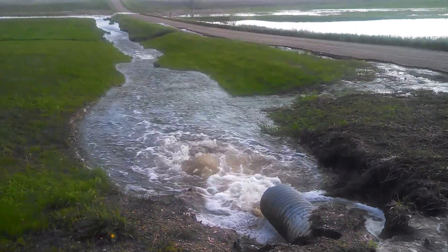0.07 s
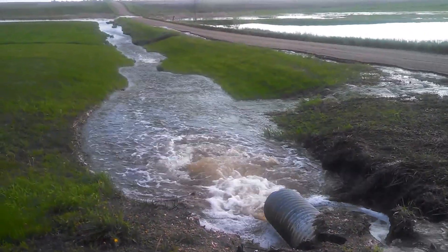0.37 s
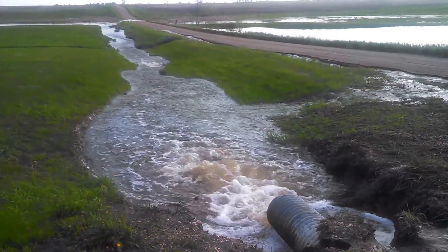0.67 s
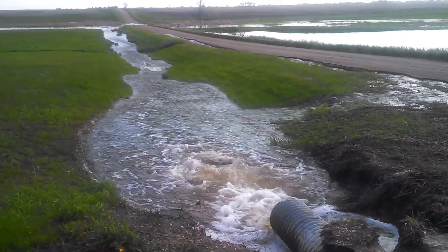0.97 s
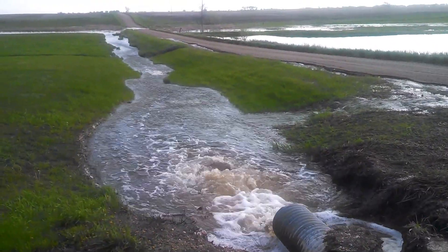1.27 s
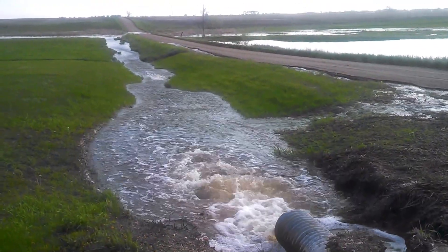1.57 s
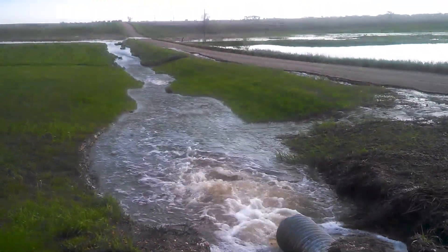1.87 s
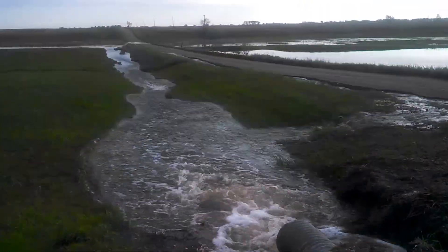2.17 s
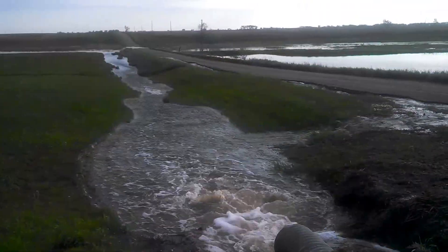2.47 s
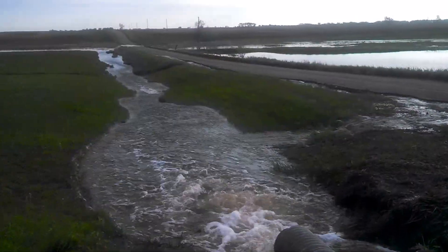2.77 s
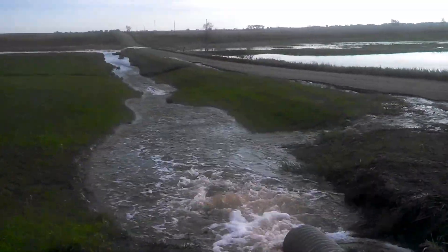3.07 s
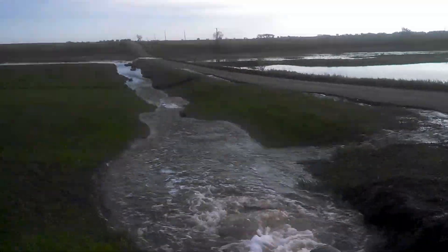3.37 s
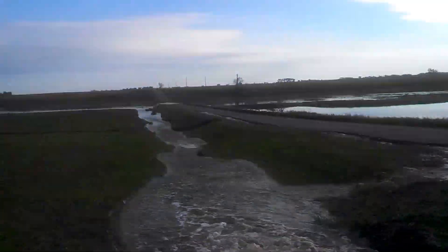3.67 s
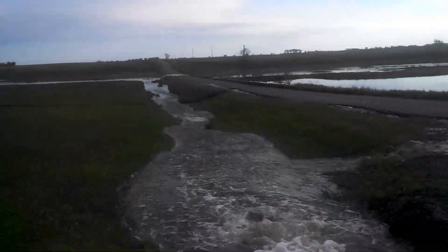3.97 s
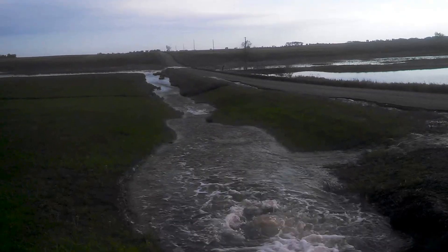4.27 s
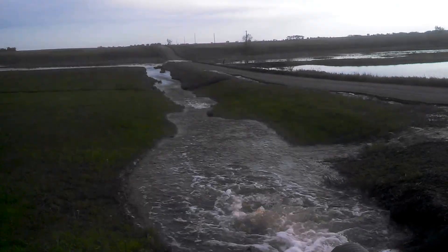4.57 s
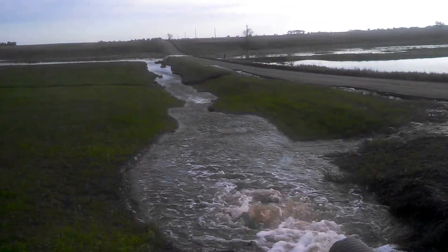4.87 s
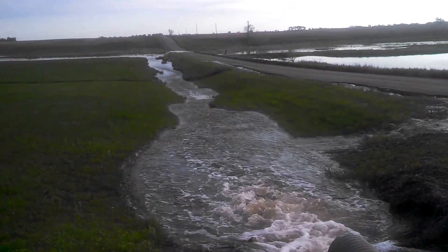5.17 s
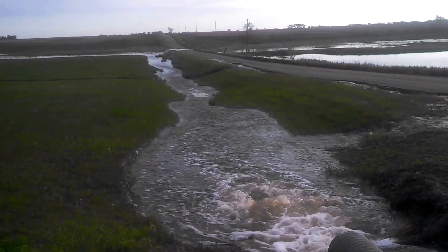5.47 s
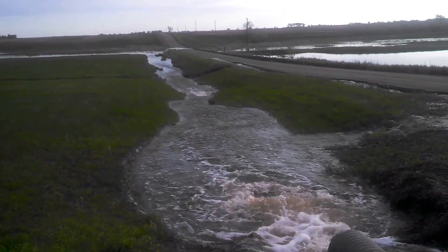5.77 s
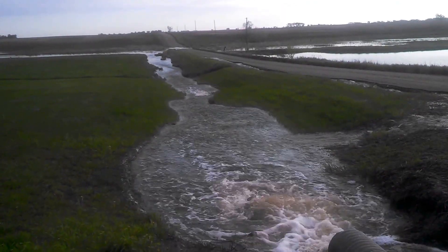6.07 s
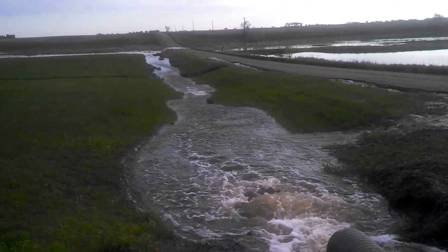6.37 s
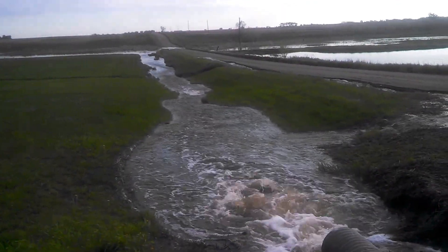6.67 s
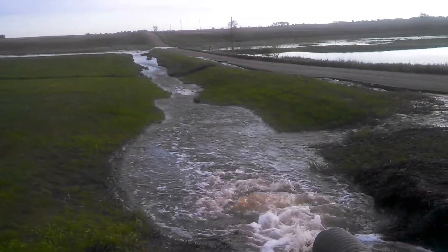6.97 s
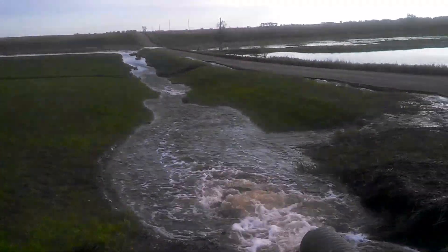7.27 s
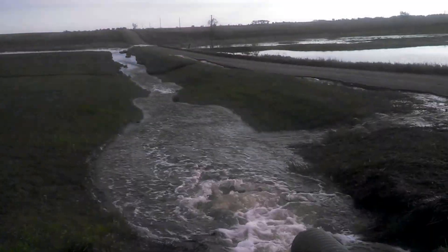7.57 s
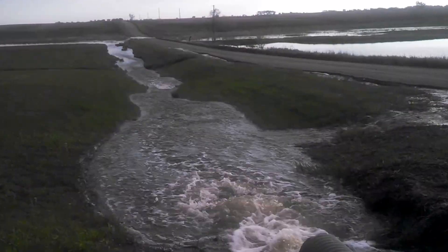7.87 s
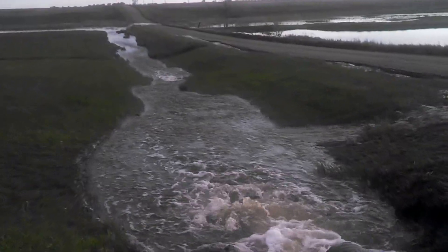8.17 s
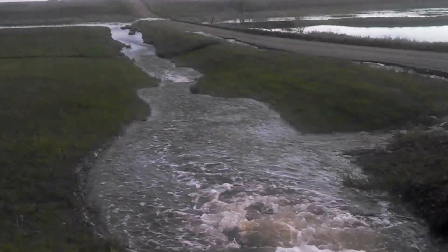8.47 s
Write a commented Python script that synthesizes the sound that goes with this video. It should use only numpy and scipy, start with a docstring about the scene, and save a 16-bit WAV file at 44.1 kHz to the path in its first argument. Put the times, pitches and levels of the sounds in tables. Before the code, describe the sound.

A steady roar of bubbling, splashing water runs throughout as a pipe empties into an outdoor pool. Uneven gusts thump and rumble against the microphone, and short whistles from a far bird are nearly buried in the rush. In the second half, fingers make three sharp clicks on the handheld camera. The strongest gusts and clicks briefly duck the sound, and a very faint high whine lies underneath.

```python
"""In open country, floodwater pours from a culvert pipe and churns a wide pool into bubbles and spray.
A songbird whistles far off. Wind buffets the two microphone ports (openings) of a hand-held camera,
whose case clicks three times under the fingers and whose electronics whine faintly.
The hardest buffets and clicks make the gain control duck, and the water swells back each time."""
import sys
import numpy as np
from scipy import signal
from scipy.fft import rfft, irfft
from scipy.io import wavfile
from scipy.ndimage import uniform_filter1d, minimum_filter1d

SR = 44100
rng = np.random.default_rng(int(sys.argv[2]) if len(sys.argv) > 2 else 0)


def generate_wav(sig):
    """Save sig (samples, or channels by samples) to the path in sys.argv[1] as 16-bit PCM at SR."""
    pcm = np.round(np.clip(np.atleast_2d(sig).T, -1, 1) * 32767).astype(np.int16)
    wavfile.write(sys.argv[1], SR, pcm)


N = 379701
TIME = np.arange(N) / SR
FRAME_S = np.arange(N // 256 + 5) * 256 / SR  # slow changes move in frames, 256 samples apart
BIN_HZ = np.fft.rfftfreq(1024, 1 / SR)  # the frequencies in each frame


# How hard the pipe pours. Each row: time in seconds, level in dB.
OUTFLOW_LEVELS = [(0.0, -5), (0.35, -1.2), (0.9, -2), (1.06, -2.5), (1.3, -4.5), (1.7, -3), (2.04, -0.7),
                  (2.25, -2), (2.44, -3), (2.66, -1.4), (2.92, -3.5), (3.2, -1.5), (3.9, -4), (4.1, -4),
                  (4.33, -6), (4.6, -3), (4.8, -4), (5.4, -3.5), (6.1, -2), (7.3, -1.5), (8.6, 0)]

def outflow(surge_db=0.41):
    """The flow swells and slackens, with small chance surges. Gives dB for each frame."""
    swell_db, = follow(OUTFLOW_LEVELS, FRAME_S)
    return swell_db + surge_db * wander(slow_hz=2.2, fast_hz=9)


# Heaves of the water. Each row: time of the crest in seconds, boost in dB, length in seconds.
WATER_HEAVES = [(0.222, 4.5, 0.079), (0.473, 3.5, 0.083), (1.15, 5.5, 0.071), (1.823, 2.5, 0.13),
                (2.66, -1.5, .08), (3.282, 3.5, 0.1), (3.43, 3.5, 0.16), (3.732, 7, 0.18),
                (4.052, 3.5, 0.18), (4.16, 1, 0.074), (4.583, -0.5, 0.09), (5.6, -1.5, 0.13),
                (7.29, 1.5, 0.095)]

def heaving(centre_hz=960, reach_octaves=1.44):
    """The water heaves and collapses, changing the middle of the rush. Gives dB by frame and frequency."""
    lift_db = sum(db * swell(s, length) for s, db, length in WATER_HEAVES)
    return lift_db[:, None] * np.exp(-(np.log2((BIN_HZ + 1) / centre_hz) / reach_octaves) ** 2)


# The tone of the rushing water. Each row: frequency in Hz, relative level in dB.
RUSH_TONE = [(200, -0.76), (330, 2), (420, -2.5), (520, -12), (680, -5.5), (900, -9), (1300, -12.5),
             (1750, -12.5), (2150, -6.5), (2550, -11), (2950, -15), (3300, -15.5), (4100, -15.5),
             (5000, -17), (5800, -19), (6500, -21), (10000, -23), (12500, -26), (14000, -26.5),
             (15000, -31.5)]
# The ground echo colours the rush as the camera moves. Each row: time in seconds,
# factor on the lower frequencies, boost near 2100 Hz in dB, boost of the top treble in dB.
GROUND_ECHO = [(0, 0.99, -4.5, -1), (2.0, 1.014, -3.5, -1.7), (2.8, 1.02, -3, -1), (3.25, 1.02, -2, 1),
               (3.6, 0.93, -0.5, 2.5), (4.8, 0.99, 1.5, -1), (5.5, 0.93, -1, -0.5), (7.0, 0.96, 1, -1),
               (8.4, 1, 0.5, -3)]
# How alike the rush is at the two ports. Each row: frequency in Hz, likeness (1 same, -1 opposite).
PORT_LIKENESS = [(300, 0.97), (520, 0.84), (950, 0.86), (1700, 0.12), (2200, 0.4), (3000, 0.16),
                 (4100, -0.2), (5500, 0.018), (6800, -0.19), (12000, 0.081), (15000, -0.077)]

def rush(flow_db, level_db=-17.5, gulp_db=1.5, slosh_db=0.84, lag_s=0.000018):
    """Countless bubbles merge into a roar; clouds of them come and go in patches."""
    shift, lift_db, top_db = follow(GROUND_ECHO, FRAME_S[:, None])
    spray_share = 1 / (1 + (1900 / (BIN_HZ + 1)) ** 4)  # 0 in the bass, 1 in the treble
    tone_db = read(RUSH_TONE, BIN_HZ / shift ** (1 - spray_share))
    tone_db += lift_db * np.exp(-((BIN_HZ - 2100) / 400) ** 2)
    tone_db += top_db / (1 + (7500 / (BIN_HZ + 1)) ** 6)  # up here the aim of the ports matters
    tone_db += flow_db[:, None] + heaving()
    tone_db += gulp_db * (1 - 0.04 * spray_share) * patches(span_s=0.04, span_hz=350)
    tone_db += slosh_db * patches(span_s=0.04, span_hz=6600)
    left, unrelated = random_spectra()
    likeness = read(PORT_LIKENESS, BIN_HZ)
    right = likeness * left + np.sqrt(1 - likeness ** 2) * unrelated
    right *= np.exp(-2j * np.pi * BIN_HZ * lag_s)  # a tiny delay: the water lies a little to one side
    return gain_of(level_db) * to_sound(np.array([left, right]) * gain_of(tone_db))


def bubbles(low_hz, high_hz, per_s, cycles, rise, spread_db, lag_s, sizes=30):
    """Bubbles of many sizes ring at random moments, each size from its own direction."""
    out = np.zeros((2, N))
    for hz in np.geomspace(low_hz, high_hz, sizes):
        born = rng.random(N) < per_s / sizes / SR
        strength = gain_of(spread_db * np.minimum(rng.exponential(1, N), 4))
        sound = signal.oaconvolve(born * strength, ring(hz, cycles / hz, rise))[:N]
        delay = round(rng.uniform(-1, 1) * lag_s * SR)
        out += [sound, np.roll(sound, delay)]
    return evened(out)


# Single splashes and plops. Each row: start in seconds, level in dB, pitch in Hz, ring time in seconds.
POOL_SPLASHES = [(0.204, -12, 1120, 0.018), (0.8395, -8.5, 4160, 0.0055), (0.982, -10, 724, 0.022),
                 (1.3, -5, 3950, 0.0052), (1.538, -21.5, 3900, 0.0072), (2.204, -19, 4040, 0.0055),
                 (2.596, -16, 3340, 0.006), (2.655, -13, 880, 0.043), (3.3889, 4, 1090, 0.0026),
                 (3.389, -5, 3800, 0.0022), (3.406, -13, 950, .025), (4.002, -14, 800, .03),
                 (4.051, -16, 1084, .025), (4.599, -19, 3920, 0.0055), (4.692, -16, 800, 0.022),
                 (5.519, -2, 2770, 0.0082), (5.569, -4, 2900, 0.0034), (6.067, -6.5, 770, 0.034),
                 (6.267, -16, 4130, 0.013), (6.4195, -12, 8900, 0.004), (6.763, -9, 3260, 0.0073),
                 (7.088, -6, 705, 0.021), (7.653, -8, 7300, 0.004), (7.764, -11, 4880, 0.0056)]

def pool(flow_db, gurgle_db=-28, patter_db=-32):
    """Near bubbles gurgle, flung droplets patter back on the pool, and single splashes stand out."""
    gurgle = bubbles(698, 2394, per_s=260, cycles=36, rise=0.038, spread_db=0.5, lag_s=0.00008)
    patter = bubbles(2575, 10670, per_s=1100, cycles=20, rise=0.055, spread_db=5, lag_s=0.0003)
    flow = gain_of(np.interp(TIME, FRAME_S, flow_db))
    splashes = rings(POOL_SPLASHES) * [[1], [0.6]]  # left and right strength
    return flow * (gain_of(gurgle_db) * gurgle + gain_of(patter_db) * patter) + splashes


# The breeze. Each row: time in seconds, relative level in dB, speed (a factor on the rumble's pitch).
BREEZE_CURVE = [(0, -19, 0.82), (0.95, -17, 0.82), (1.3, -11.5, 0.88), (1.7, -18, 0.69), (2.2, -17.5, 0.92),
                (2.48, -15.5, 1.57), (3.0, -21, 0.95), (3.2, -21, 0.61), (3.65, -28, 0.78),
                (4.3, -17.5, 1.45), (4.58, -24.5, 1), (4.9, -13, 1.2), (5.3, -28, 0.83),
                (6.55, -23.5, 0.98), (7.0, -25, 0.49), (7.95, -24, 0.94), (8.2, -14, 0.94),
                (8.6, -16.5, 1.45)]
# Gusts. Each row: time of the crest in seconds, relative level in dB, length in seconds, speed as above.
WIND_GUSTS = [(0.09, -10, 0.041, 0.5), (0.38, -10, 0.06, 0.71), (0.98, -10.5, 0.023, 1.7),
              (1.218, -9, 0.068, 0.5), (1.805, -12.5, 0.087, 0.78), (2.297, -6, 0.039, 1.45),
              (2.336, -10, 0.037, 1.6), (2.483, -10.5, 0.095, 1.55), (2.555, -9, 0.037, 1.2),
              (2.69, -9, 0.024, 1.55), (2.785, -15, .06, 1.25), (2.85, -6.5, 0.042, 1.1),
              (2.964, -5.5, 0.043, 1.6), (2.99, -1.5, .025, 1.05), (3.062, -6.5, 0.024, 1.47),
              (3.391, -12.5, 0.02, 2), (3.735, -9, 0.06, 1.1), (3.812, -8.5, 0.12, 0.98),
              (3.887, -12.5, 0.051, 1), (4.18, -9, 0.03, 1.15), (4.45, -14.5, 0.086, 0.67),
              (4.628, -12, 0.032, 1.1), (4.699, -12.5, 0.022, 1.4), (4.773, -2, 0.065, 1.42),
              (4.856, -7, 0.045, 1), (4.896, -8, 0.033, 2), (4.994, -10.5, 0.068, 1.24),
              (5.196, -15, 0.048, 1.5), (5.398, -8, 0.024, 1.2), (5.479, -10, 0.059, 0.91),
              (5.608, -11.5, 0.025, 1.04), (5.647, -15, 0.019, 1.06), (5.81, -17, 0.04, 0.86),
              (5.899, -8.5, 0.054, 1), (6.004, -11, 0.019, 1.4), (6.142, -15.5, 0.06, .9),
              (6.38, -19, 0.04, 1.5), (6.59, -20.5, 0.11, 1.3), (6.68, -13, 0.1, 0.71),
              (7.166, -10.5, .06, 0.49), (7.461, -12.5, 0.044, 0.92), (8.12, -8, 0.092, 1.4),
              (8.488, -10, 0.063, 0.86)]

def airflow(flutter_db=2):
    """Strength and speed of the fluttering breeze plus its gusts; the strongest sways the speed most."""
    breeze_db, breeze_speed = follow(BREEZE_CURVE, FRAME_S)
    breeze_db += flutter_db * wander(slow_hz=4, fast_hz=11)
    currents = [(gain_of(breeze_db), breeze_speed)]
    currents += [(gain_of(db) * swell(s, length), speed) for s, db, length, speed in WIND_GUSTS]
    power = sum(strength ** 2 for strength, _ in currents)
    mean_speed = sum(strength ** 2 * speed for strength, speed in currents) / power
    return np.sqrt(power), mean_speed


# The rumble of swirling air. Each row: frequency in Hz, relative level in dB.
RUMBLE_TONE = [(20, -7.5), (45, 4), (70, 5), (130, -1.5), (200, -5.5), (300, -17), (450, -29), (800, -46),
               (2000, -34.5), (6000, -83)]
# Slams of air. Each row: time in seconds, relative level in dB, half length in seconds, pitch in Hz.
AIR_SLAMS = [(2.268, 6, 0.003, 128), (2.492, -2, 0.0028, 192), (2.966, 7.5, 0.0026, 229),
             (4.718, 9.5, 0.003, 129)]

def wind(level_db=5):
    """Swirls of air rumble on each port separately; now and then one slams into the left port."""
    strength, speed = airflow()
    tone_db = read(RUMBLE_TONE, BIN_HZ / speed[:, None])  # faster air: smaller swirls, higher rumble
    swirls = to_sound(random_spectra() * gain_of(tone_db))
    # Even out the swirls, so the air's strength sets the pressure difference between the ports.
    difference_power = (swirls[0] - swirls[1]) ** 2 / 2
    swirls /= np.sqrt(0.15 + signal.oaconvolve(difference_power, np.hanning(2001) / 1000, "same"))
    slams = np.zeros(N)
    for s, db, half_s, hz in AIR_SLAMS:
        pulse = np.exp(-((TIME - s) / half_s) ** 2)
        slams += 2 * gain_of(db) * pulse * np.cos(2 * np.pi * hz * (TIME - s))
    return gain_of(level_db) * np.interp(TIME, FRAME_S, strength) * swirls + slams * [[1], [0]]


# The tones the case rings with. Each row: pitch in Hz, relative level in dB.
CASE_TONES = [(1300, -17), (2300, -20), (3900, 0.5), (6300, 2.5), (7600, 4), (8700, 4), (10300, 4),
              (11700, 2), (13100, -3), (14900, -10.5)]
# Sharp clicks. Each row: start in seconds, relative level on the left and on the right in dB,
# ring time in seconds, brightness in dB per octave.
CASE_CLICKS = [(5.6862, -12, 10.5, 0.005, 3), (7.3704, 9.5, 3.5, 0.0037, -2), (7.4778, 20, -4, 0.004, 7)]
# Dull finger knocks. Each row: start in seconds, level in dB, pitch in Hz, ring time in seconds.
FINGER_KNOCKS = [(5.687, -1, 2100, 0.0034), (7.3705, -4.5, 2100, 0.0054), (7.4700, -6, 1280, 0.014),
                 (7.4775, -2, 900, 0.0052)]

def camera_case():
    """The plastic case knocks dully under the fingers and snaps, beside one port or between the two."""
    clicks = np.zeros((2, N))
    for s, left_db, right_db, ring_s, tilt_db in CASE_CLICKS:
        snap = sum((-1) ** k * gain_of(tone_db + tilt_db * np.log2(hz)) * ring(hz, ring_s)
                   for k, (hz, tone_db) in enumerate(CASE_TONES))
        for port, db in zip(clicks, (left_db, right_db)):
            add(port, s, 2 * gain_of(db) * snap / abs(snap).max())
    return clicks + rings(FINGER_KNOCKS) * [[1], [0.33]]


# The bird's notes. Each row: start in seconds, length in seconds, pitch in Hz, slide in Hz, level in dB.
BIRD_NOTES = [(2.022, 0.055, 3070, -7, -28), (2.156, 0.078, 2280, 99, -19), (2.455, .049, 3000, 64, -23),
              (2.575, .031, 3270, 168, -23), (2.623, .04, 2920, -220, -20), (4.024, 0.079, 2330, -220, -22),
              (4.605, 0.033, 3160, 141, -26), (4.632, .048, 2630, -110, -18),
              (4.77, 0.134, 2290, -150, -20), (6.327, 0.099, 3060, 37, -21), (6.46, 0.021, 2980, -89, -25),
              (6.493, 0.086, 2260, -17, -19.5), (6.848, 0.045, 3830, 207, -22)]

def bird(arch_hz_per_s=750):
    """A far songbird whistles short phrases of pure sliding notes, nearly buried in the rush."""
    song = np.zeros(N)
    for s, length, pitch_hz, slide_hz, db in BIRD_NOTES:
        progress = np.linspace(0, 1, round(length * SR))
        arch = np.sin(np.pi * progress)
        hz = pitch_hz + slide_hz * (progress - 0.5)
        hz += arch_hz_per_s * length * (arch - arch.mean())  # longer notes bow up more in the middle
        add(song, s, gain_of(db) * arch * np.sin(2 * np.pi * np.cumsum(hz) / SR))
    return song * [[0.11], [1]]


def whine(hz=13431, level_db=-39):
    """The camera's electronics leak a thin steady tone into the left microphone."""
    return gain_of(level_db) * np.sin(2 * np.pi * hz * TIME) * [[1], [0]]


def gain_of(db):
    """Turns decibels into a factor to multiply by."""
    return 10 ** (np.asarray(db) / 20)


def evened(x):
    """Scales a signal to an average strength (rms) of 1."""
    return x / np.sqrt(np.mean(x ** 2) + 1e-20)


def read(rows, hz):
    """Looks up a table at the given frequencies."""
    row_hz, values = np.transpose(rows)
    return np.interp(np.log(hz + 1), np.log(row_hz + 1), values)


def follow(rows, t):
    """Looks up each column of a table at the given times."""
    s, *columns = np.transpose(rows)
    return [np.interp(t, s, column) for column in columns]


def add(mix, s, sound):
    """Mixes a sound in, starting at s seconds."""
    part = mix[max(round(s * SR), 0):][:len(sound)]
    part += sound[:len(part)]


def ring(hz, ring_s, rise=0):
    """A tone that fades by 60 dB in ring_s; rise lifts its pitch, like a bubble nearing the surface."""
    t = np.arange(int(ring_s * SR) + 2) / SR
    return gain_of(-60 * t / ring_s) * np.sin(2 * np.pi * hz * t * (1 + rise * t / ring_s))


def rings(rows):
    """Plays one fading tone for each row of a table."""
    out = np.zeros(N)
    for s, db, hz, ring_s in rows:
        add(out, s, gain_of(db) * ring(hz, ring_s))
    return out


def random_spectra():
    """Two unrelated white noises, laid out by frame and frequency."""
    real, imag = rng.standard_normal((2, 2, len(FRAME_S), len(BIN_HZ)))
    return real + 1j * imag


def to_sound(spectra):
    """Joins frames into a sound with an average strength of 1."""
    _, sound = signal.istft(spectra, nperseg=1024, noverlap=768, time_axis=1, freq_axis=2)
    return evened(sound[:, :N])


def patches(span_s, span_hz):
    """A random pattern over time and frequency, smooth over the given spans."""
    field = rng.standard_normal((len(FRAME_S), len(BIN_HZ)))
    field = uniform_filter1d(field, round(span_s / FRAME_S[1]), axis=0)
    return evened(uniform_filter1d(field, round(span_hz / BIN_HZ[1]), axis=1, mode="wrap"))


def wander(slow_hz, fast_hz):
    """A smooth random curve, one value a frame."""
    rates = np.geomspace(slow_hz, fast_hz, 24)
    return evened(sum(np.sin(2 * np.pi * (hz * FRAME_S + rng.random())) / np.sqrt(hz) for hz in rates))


def swell(crest_s, length_s):
    """A smooth rise to 1 and fall back, one value a frame."""
    return np.exp(-(2 * (FRAME_S - crest_s) / length_s) ** 2)


def scene():
    """All the sounds together at the left and right ports."""
    flow_db = outflow()
    return rush(flow_db) + pool(flow_db) + wind() + camera_case() + bird() + whine()


def widen(ports, travel_samples=16):
    """Widens the stereo: each side subtracts the other, delayed by sound's trip from port to port."""
    return (ports - np.roll(ports[::-1], travel_samples, axis=1)) / 2


def gain_control(x, ceiling_db=-0.5, recovery_db_per_s=8.5, smooth_samples=15):
    """A peak over the ceiling turns the volume down within a millisecond; it creeps back up."""
    over_db = np.maximum(20 * np.log10(abs(x).max(0) + 1e-9) - ceiling_db, 0)
    creep_db = recovery_db_per_s * TIME
    gain = gain_of(creep_db - np.maximum.accumulate(over_db + creep_db))
    return x * uniform_filter1d(minimum_filter1d(gain, smooth_samples), smooth_samples)


def record(dry, bass_cut_hz=46, treble_cut_hz=15400):
    """The camera widens the sound, cuts deep bass, leans right, ducks peaks and cuts the top treble."""
    bass_cut = signal.butter(4, bass_cut_hz, "high", fs=SR, output="sos")
    x = signal.sosfilt(bass_cut, widen(dry))
    hz = np.fft.rfftfreq(N, 1 / SR)
    lean_db = 0.5 + 0.97 / (1 + (hz / 2400) ** 8)  # the right side is a little louder and fuller
    x = irfft(rfft(x) * gain_of([-lean_db / 2, lean_db / 2]), N)
    treble_cut = signal.firwin(255, treble_cut_hz, window=("kaiser", 9), fs=SR)
    return signal.oaconvolve(gain_control(x), treble_cut[None], "same")


dry = scene()
out = record(dry)
generate_wav(out)
```